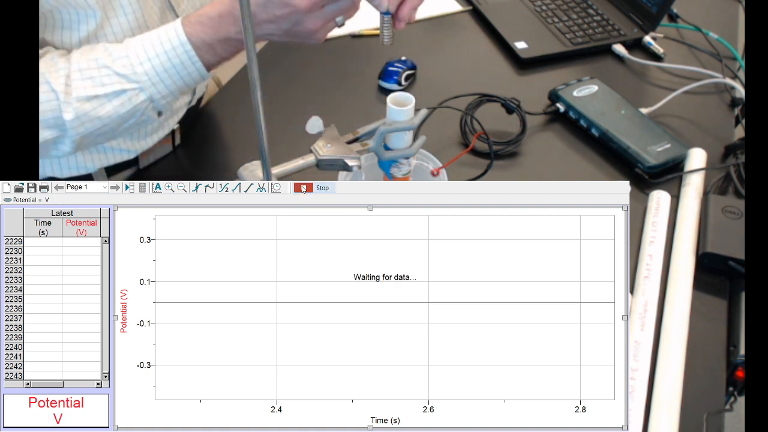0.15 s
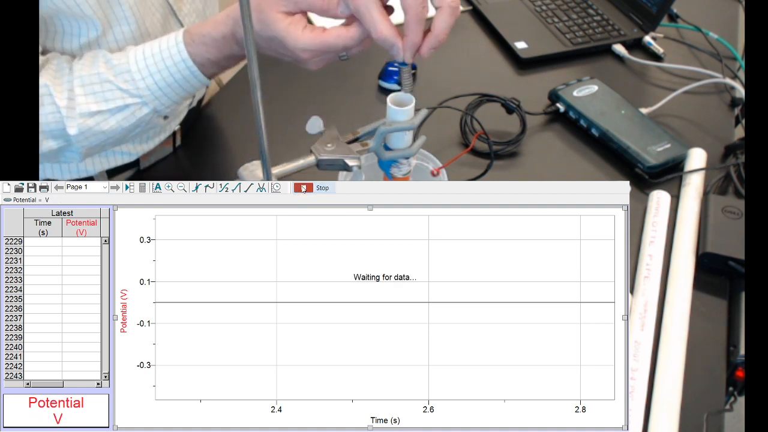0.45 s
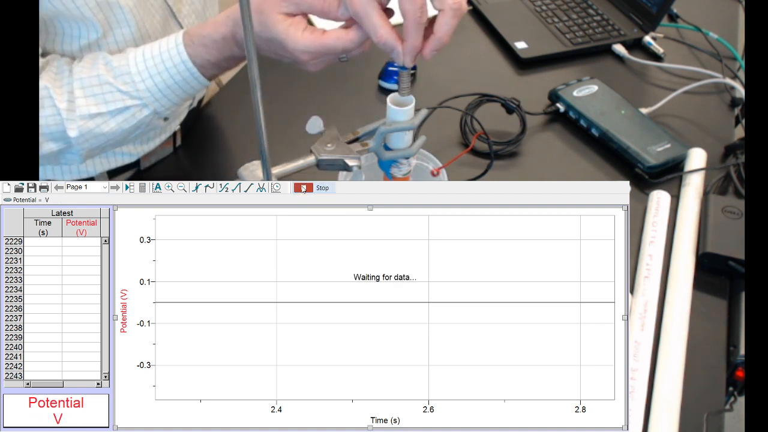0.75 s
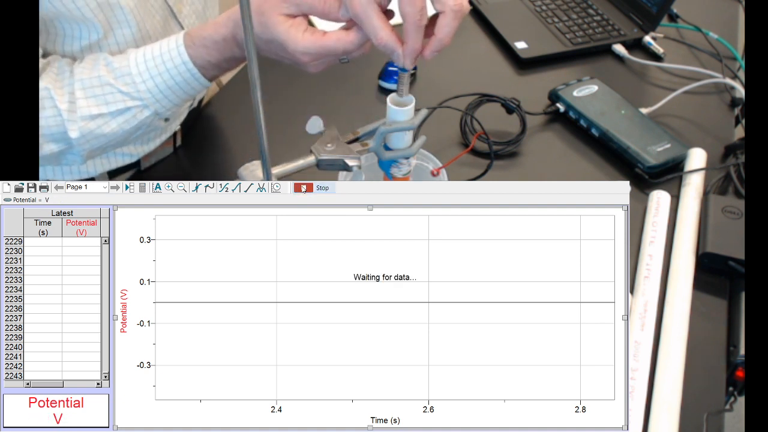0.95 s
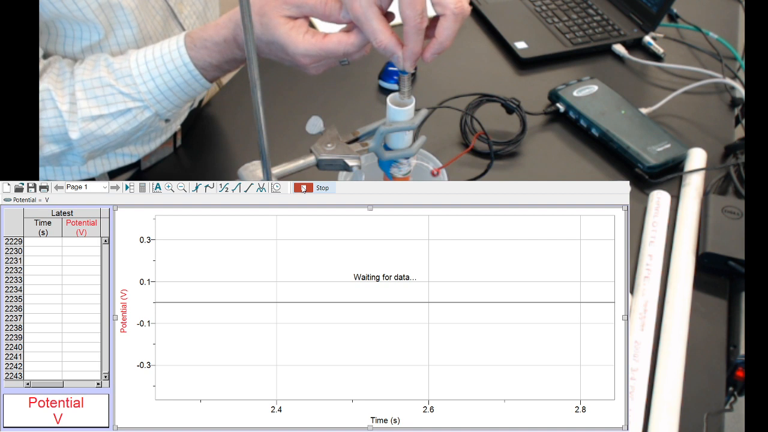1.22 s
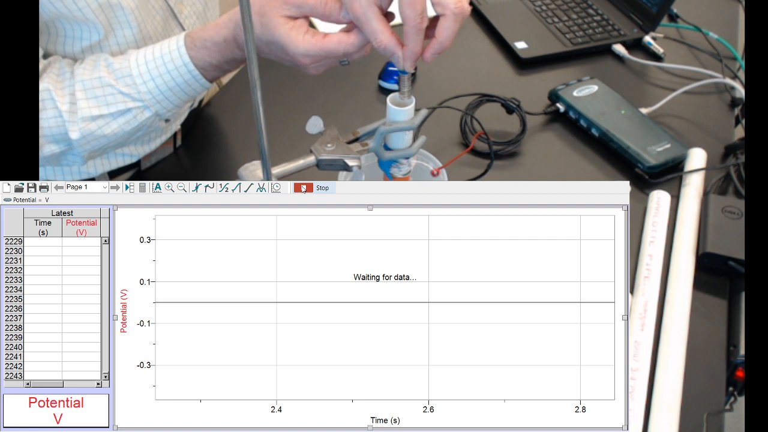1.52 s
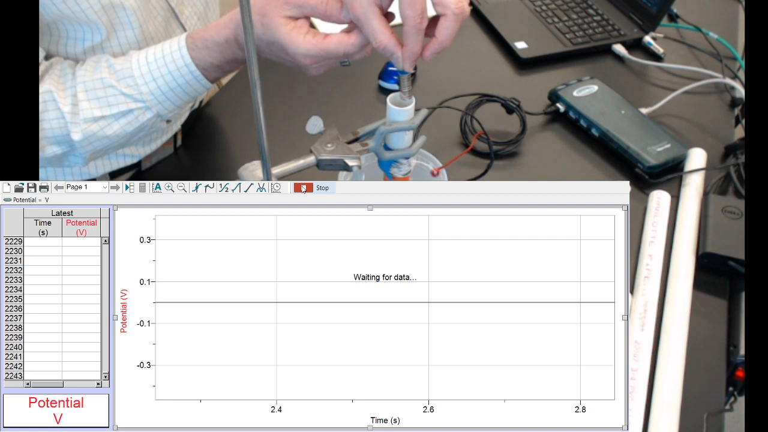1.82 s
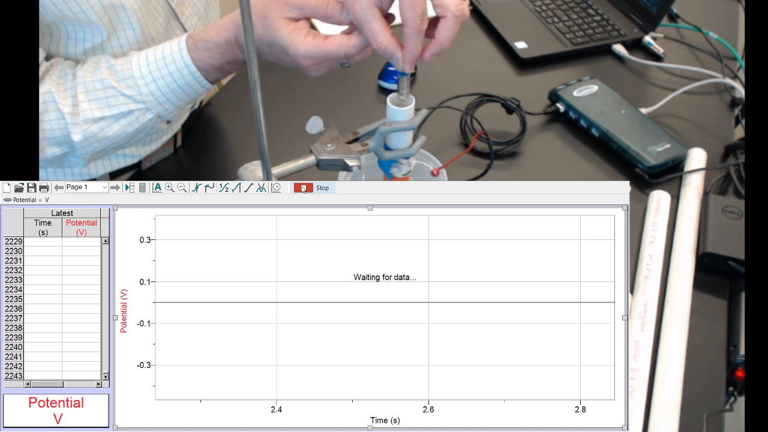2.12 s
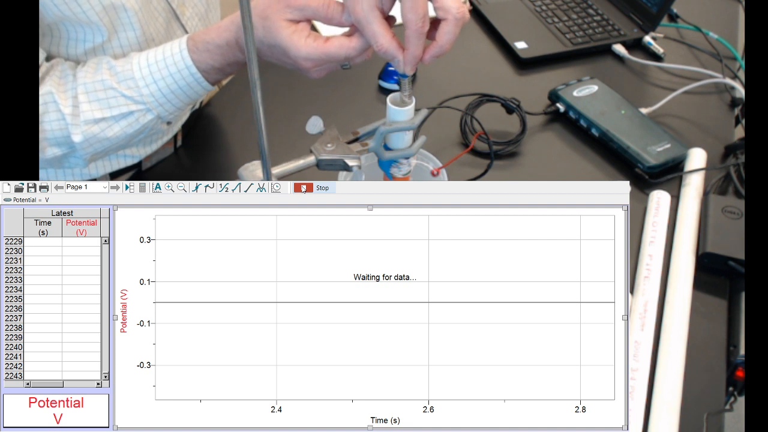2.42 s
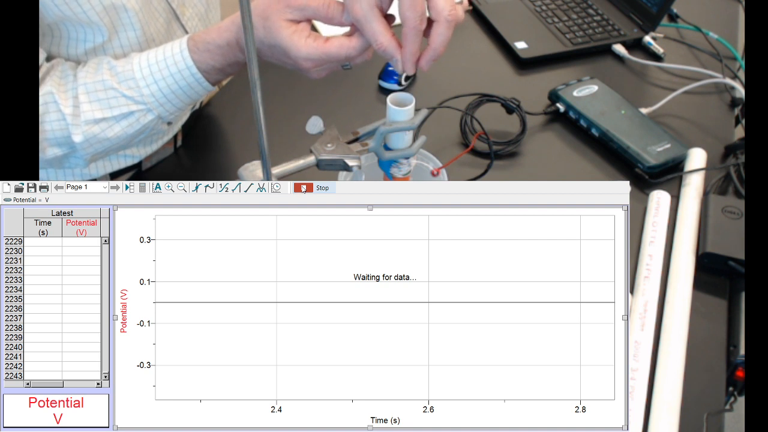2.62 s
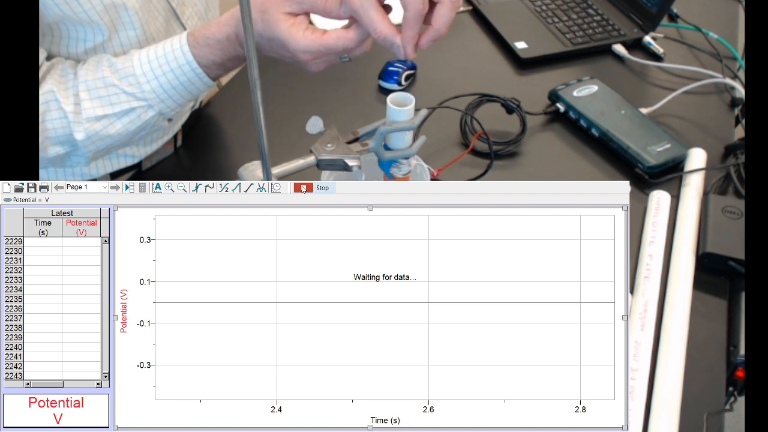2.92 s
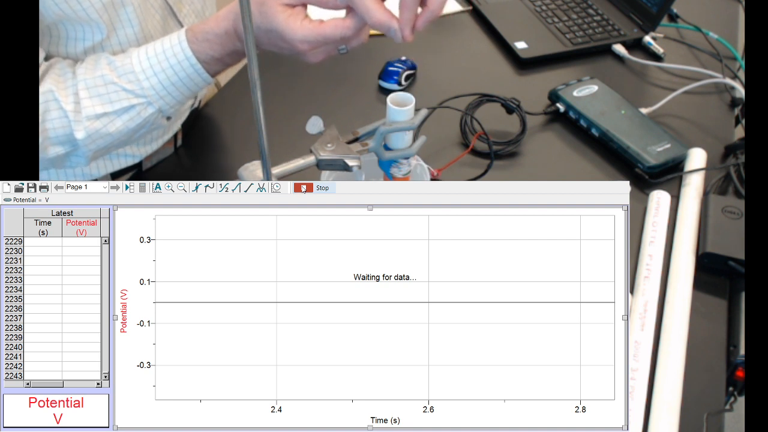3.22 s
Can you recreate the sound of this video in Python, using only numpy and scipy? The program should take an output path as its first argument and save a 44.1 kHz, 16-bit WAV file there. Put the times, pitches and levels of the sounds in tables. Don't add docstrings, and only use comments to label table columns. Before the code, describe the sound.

Small magnets land in a plastic tube with a sharp hollow clack after quiet ventilation

```python
import sys
import numpy as np
from scipy import signal
from scipy.fft import rfft, irfft, next_fast_len
from scipy.io import wavfile
from scipy.ndimage import uniform_filter1d, map_coordinates

SR = 44100
rng = np.random.default_rng(int(sys.argv[2]) if len(sys.argv) > 2 else 0)


def makeup_ratio(level_db):
    decades = np.asarray(level_db, float) / 20
    return 10 ** decades


def persist_wave(psi):
    counts = np.round(np.clip(psi, -1, 1) * 32767).astype(np.int16)
    wavfile.write(sys.argv[1], SR, np.atleast_2d(counts).T)


N = 147735
LANDING_S = 2.76

# [t/s, level/dB]
KNOCKS = [(2.7693, -17.5), (2.7735, -9.5), (2.7762, -12), (2.7782, -6), (2.7796, -8.5), (2.7835, -19),
          (2.802, -21), (2.812, -23), (2.823, -39), (2.855, -38), (2.896, -35), (2.932, -42), (2.955, -22),
          (2.971, -25.5), (3.076, -27), (3.083, -23)]
# [f/Hz, level/dB, t60/s]
TUBE_MODES = [(200, -31, .05), (300, -7.5, 0.027), (378, -4.5, 0.043), (516, -15, .03), (539, -0.5, 0.042),
              (618, 3, 0.029), (724, -5.5, .025), (786, -3.5, 0.04), (1073, -9.5, 0.027), (1346, -9, 0.061),
              (1436, -13, 0.062), (1692, -7, 0.03), (2220, -11.5, 0.073), (3006, -13, 0.024)]
# [t/s, peak level/dB, f/Hz, t60/s]
CLICKS = [(0.01, -36, 8050, 0.0069), (0.0162, -29.5, 7190, 0.0089), (0.0165, -26.5, 9740, 0.0076),
          (.033, -40, 10260, .01), (2.7093, -45, 7660, .03), (2.7086, -37.5, 10400, .02),
          (2.77, -28, 9000, .02), (2.775, -18, 9500, 0.014), (2.789, -13.5, 5800, 0.012),
          (2.790, -18, 9550, 0.011), (2.806, -17.5, 5620, 0.029), (2.821, -18.5, 9100, .012),
          (2.834, -19.5, 3900, .012), (2.839, -19.5, 8620, 0.024), (2.841, -18.5, 3450, 0.013),
          (2.876, -15, 7050, 0.005), (2.889, -26, 9560, 0.0083), (2.956, -29, 9420, 0.014),
          (2.9567, -23.5, 5700, 0.01), (2.961, -26, 10170, 0.012), (2.9744, -22, 6030, 0.0076),
          (2.983, -29.5, 5560, 0.011), (2.986, -27.5, 10300, 0.013), (3.0755, -36.5, 9530, 0.042),
          (3.076, -44, 4700, 0.016), (3.0738, -31.5, 1080, 0.063), (2.944, -32, 5730, 0.037),
          (3.04, -44, 6000, .04), (3.093, -42, 6300, .02), (3.111, -41, 9500, 0.02)]
# [t/s, level/dB]
RATTLE = [
    (2.77, -24),
    (2.776, -18),
    (2.83, -29),
    (2.842, -31.5),
    (2.848, -33),
    (2.915, -44),
          (2.92, -39.5),
    (2.956, -37),
    (3.03, -48.5),
    (3.046, -43.5),
    (3.062, -52.5),
    (3.076, -48),
    (3.098, -48.5),
    (3.2, -54),
]
# [f/Hz, level/dB per Hz]
CLATTER_COLOUR = [(530, -26), (900, 8), (1330, 1), (1870, -5.5), (2170, -3), (4270, -8), (8860, -5),
                  (11000, -9), (12200, -47), (15800, -66), (22000, -120)]
# [f/Hz, t60/s]
ROOM_DECAY = [(200, 1), (700, 0.29), (2500, 0.44), (10000, 0.35)]
# [t/s, level/dB]
AIRFLOW = [(0.0, -44), (0.45, -39), (0.51, -48), (0.7, -41), (1.05, -42.5), (1.07, -42), (1.31, -41),
           (1.36, -34.5), (1.46, -41), (1.76, -40.5), (1.79, -45.5), (2.03, -37), (2.07, -49), (2.12, -40),
           (2.72, -39.5)]
# [f/Hz, level/dB per Hz]
RUMBLE_COLOUR = [(15, -93), (25, -79), (81, -19), (95, -16.5), (118, -4), (151, -3.5), (281, -8),
                 (387, -16), (950, -31), (1240, -33.5), (2090, -120)]
AIR_COLOUR = [(400, -62), (800, -24), (1050, -2.5), (1350, -1), (1800, -4), (2500, -9), (4100, -13),
              (5300, -24), (9000, -120)]
HISS_COLOUR = [(2350, -53), (4000, -16.5), (4580, 0), (5360, 1), (5800, 0), (9500, -6.5), (11000, -12.5),
               (11500, -26), (12200, -42), (15800, -70), (22000, -120)]
FADING_HISS_COLOUR = [(1200, -120), (1800, -14), (3500, -6), (5500, 3.5), (8000, -0.5), (10500, -2.5),
                      (11600, -20), (12300, -120)]
# [f/Hz, level/dB]
WHINES = [(1109, -82), (4420, -89), (4707, -84), (6121, -82)]
# [f/Hz, width/Hz, depth 0-1]
DESK_DIPS = [(894, 50, 0.73), (1470, 26, 0.46)]


def unit(x):
    return x / np.sqrt(np.mean(x ** 2) + 1e-20)


def along(points, hz):
    f, value = np.transpose(points)
    return np.interp(np.log(hz + 1), np.log(f + 1), value)


def wobble(rate):
    knots = rng.standard_normal(int(N * rate / SR) + 4)
    return map_coordinates(knots, [np.arange(N) * rate / SR])


def filtered(x, response):
    m = next_fast_len(N + SR // 2)
    return irfft(rfft(x, m) * response(np.fft.rfftfreq(m, 1 / SR)), m)[:N]


def knocks():
    push = np.zeros(N)
    for s, db in KNOCKS:
        push[round(s * SR):][:16] += makeup_ratio(db - 26.5) * np.hanning(16)
    return tube(push)


def tube(force):
    t = np.arange(SR // 4) / SR
    ring = sum(makeup_ratio(db - 60 * t / t60) * np.sin(2 * np.pi * hz * t) for hz, db, t60 in TUBE_MODES)
    return signal.fftconvolve(force, ring)[:N]


def clicks():
    rings, cracks = np.zeros((2, N))
    t = np.arange(SR // 20) / SR
    for s, db, hz, t60 in CLICKS:
        drift, noise = rng.standard_normal((2, len(t)))
        here = slice(round(s * SR), round(s * SR) + len(t))
        onset = 1 - np.exp(-t / 0.00045)
        tone = np.sin(2 * np.pi * hz * t + 0.33 * np.cumsum(drift))
        rings[here] += makeup_ratio(db - 60 * t / t60) * onset * tone
        if s > LANDING_S and hz > 3000:
            onset = 1 - np.exp(-t / 0.0005)
            cracks[here] += makeup_ratio(db - 4 - 60 * t / (0.7 * t60)) * onset * noise
    return rings + filtered(cracks, lambda hz: makeup_ratio(along(CLATTER_COLOUR, hz) + 8))


def rattle():
    fizz_db, boom_db, fade_db_per_s, hits_per_s = -3.5, -4.5, 80, 5000
    t = np.arange(N) / SR
    landed = t > LANDING_S
    s, db = np.transpose(RATTLE)
    strength_db = np.interp(t, s, db, left=-140) - fade_db_per_s * np.maximum(t - s[-1], 0)
    swell_s, swell_peak_db, swell_db_per_s = 2.7692, -42.5, 700
    swell_level_db = np.where(t < swell_s, swell_peak_db + swell_db_per_s * (t - swell_s), -140)

    grains = chips()
    grains = 1.1 * grains / np.std(grains[landed])
    clumped = (grains + rng.standard_normal(N)) * makeup_ratio(2 * wobble(90))
    fizz = filtered(clumped, lambda hz: makeup_ratio(along(CLATTER_COLOUR, hz)))
    fizz = fizz / np.std(fizz[landed])

    hits = (rng.random(N) < hits_per_s / SR) * rng.standard_normal(N)
    hits = unit(hits * makeup_ratio(2.5 * wobble(300)))
    boom = tube(hits * makeup_ratio(strength_db)) / np.std(tube(hits))
    return (makeup_ratio(fizz_db + strength_db) + makeup_ratio(swell_level_db)) * fizz + makeup_ratio(boom_db) * boom


def chips():
    chips_per_s, centre_hz, octaves, cycles, spread_db = 3000, 5500, 1.1, 3.5, 2
    start = round(LANDING_S * SR) - 2000
    count = round(chips_per_s * (N / SR - LANDING_S))
    at, pitch, size = rng.random(count), rng.standard_normal(count), rng.exponential(size=count)
    hz = np.clip(centre_hz * 2 ** (octaves * pitch), 1500, 11500)[:, None]
    k = np.arange(400)
    level = makeup_ratio(spread_db * size)[:, None] * np.sqrt(hz)
    rings = level * np.exp(-k / SR * hz / cycles) * np.sin(2 * np.pi * hz * k / SR)
    where = (start + at * (N - start)).astype(int)[:, None] + k
    return np.bincount(where.ravel(), rings.ravel(), N + 400)[:N]


def room(x):
    wall_s = 0.006
    hz, t, z = signal.stft(rng.standard_normal(SR), SR, nperseg=256)
    decay = makeup_ratio(-60 * t / along(ROOM_DECAY, hz)[:, None])
    tail = signal.istft(z * decay, SR, nperseg=256)[1]
    delayed = np.pad(x, (round(wall_s * SR), 0))
    return signal.fftconvolve(delayed, tail / np.linalg.norm(tail))[:N]


def ventilation():
    t = np.arange(N) / SR
    flow_db = np.interp(t, *np.transpose(AIRFLOW))
    flow_db = flow_db - flow_db.mean()
    rumble = makeup_ratio(-40.84 + 0.48 * flow_db + 0.65 * wobble(12)) * rush(RUMBLE_COLOUR, patchy_db=0.5)
    hum = np.sin(2 * np.pi * 115.9 * t + 2.13 * wobble(4.99))
    hum = makeup_ratio(-48.5 + 1.9 * flow_db + 2.8 * wobble(7.1)) * hum
    air = makeup_ratio(-63 + 0.3 * wobble(3.21)) * rush(AIR_COLOUR, patchy_db=0.8)
    whine = np.zeros(N)
    for hz, db in WHINES:
        whine += makeup_ratio(db + 5 + 2 * wobble(6)) * np.sin(2 * np.pi * hz * t + 1.5 * wobble(9))
    squeaks = squeak(s=0.168, length_s=0.014, hz=6560, db=-57)
    squeaks = squeaks + squeak(s=1.79, length_s=0.035, hz=4730, db=-60.5)
    return rumble + hum + air + whine + squeaks


def squeak(s, length_s, hz, db):
    t = np.arange(N) / SR
    swell = np.exp(-((t - s) / length_s) ** 2)
    return makeup_ratio(db) * swell * np.sin(2 * np.pi * hz * t + 0.75 * wobble(60))


def hiss():
    pulse_hz, pulse_db = 29.9, 0.26
    t = np.arange(N) / SR
    pulse = sum(np.cos(2 * np.pi * k * pulse_hz * t) for k in range(1, 4))
    fan_db = -60.5 + pulse_db * pulse + 0.35 * wobble(3.5)
    fading = makeup_ratio(-55) * np.exp(-t / 0.42) * rush(FADING_HISS_COLOUR, patchy_db=0.5)
    return makeup_ratio(fan_db) * rush(HISS_COLOUR, patchy_db=0.2) + fading


def rush(colour, patchy_db):
    z = signal.stft(rng.standard_normal(N + 512), nperseg=512)[2]
    field = uniform_filter1d(rng.standard_normal(z.shape), 5, 0)
    field = unit(uniform_filter1d(field, 12, 1))
    x = signal.istft(z * makeup_ratio(patchy_db * field), nperseg=512)[1][:N]
    return unit(filtered(x, lambda hz: makeup_ratio(along(colour, hz))))


def scene():
    room_db, low_cut_hz, roll_hz, roll_db_per_khz = -8.5, 220, 11400, 34
    ticks = filtered(clicks(), lambda hz: makeup_ratio(-roll_db_per_khz * np.maximum(hz - roll_hz, 0) / 1000))
    drop = knocks() + ticks + rattle()
    drop = filtered(drop, lambda hz: (1j * hz / (low_cut_hz + 1j * hz)) ** 2)
    return (drop + makeup_ratio(room_db) * room(drop) + ventilation() + hiss())[None]


def band_limit(x):
    return signal.sosfilt(signal.butter(12, 12300, fs=SR, output="sos"), x)


def record(dry):
    def microphone(hz):
        response = np.clip((12300 - hz) / 300, 0, 1)
        for centre, width, depth in DESK_DIPS:
            response = response * (1 - depth / (1 + ((hz - centre) / width) ** 2))
        return response

    return band_limit(filtered(dry[0], microphone)[None])


dry = scene()
out = record(dry)
persist_wave(out)
```